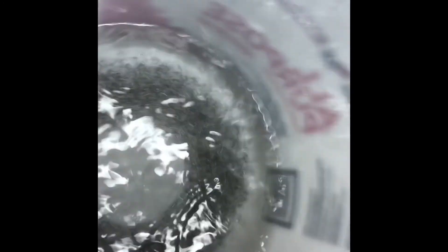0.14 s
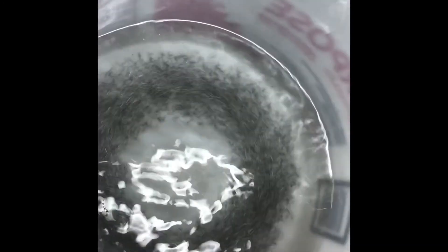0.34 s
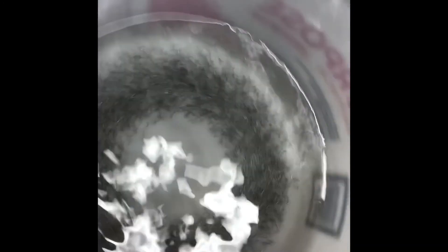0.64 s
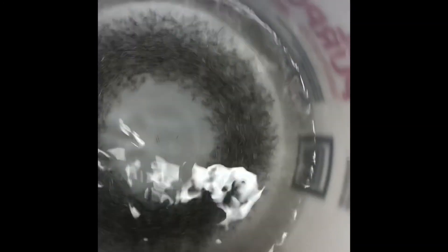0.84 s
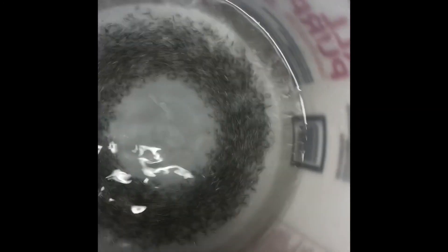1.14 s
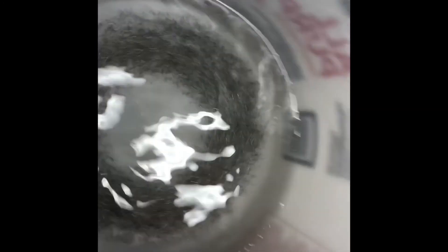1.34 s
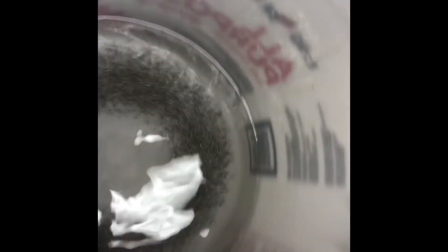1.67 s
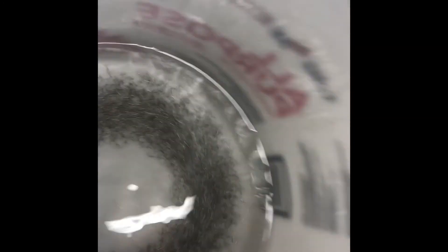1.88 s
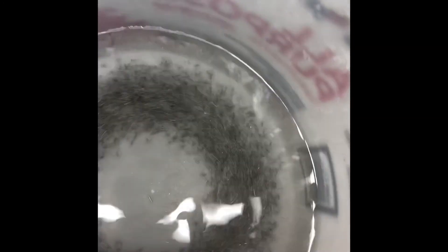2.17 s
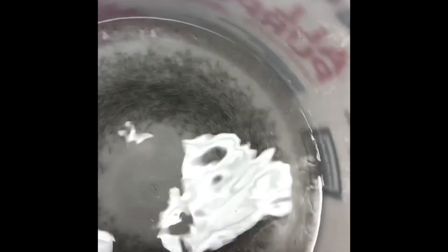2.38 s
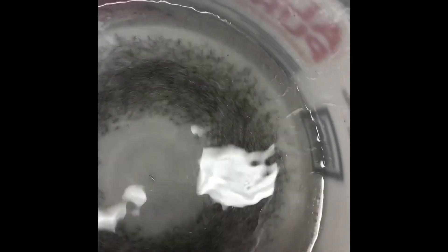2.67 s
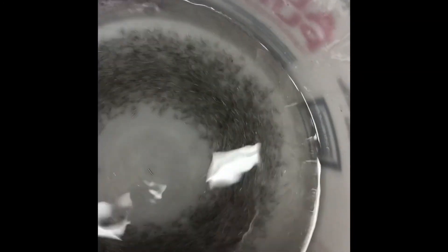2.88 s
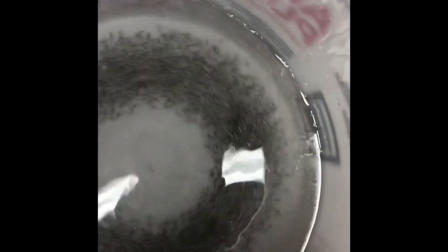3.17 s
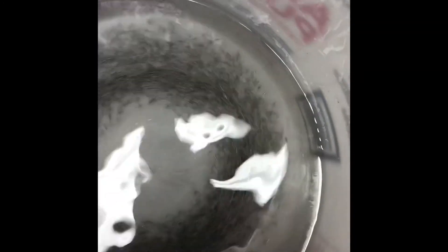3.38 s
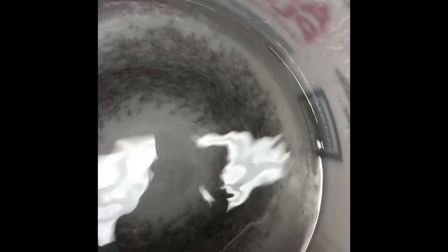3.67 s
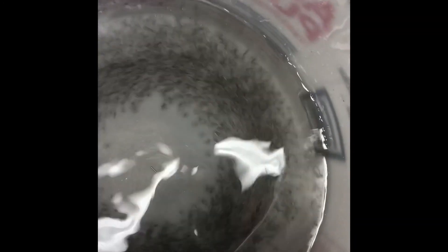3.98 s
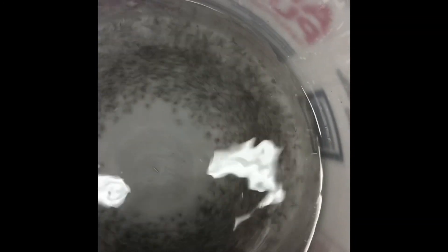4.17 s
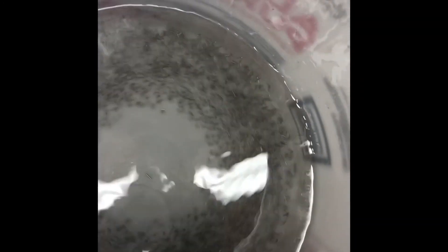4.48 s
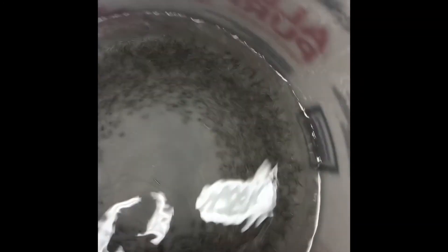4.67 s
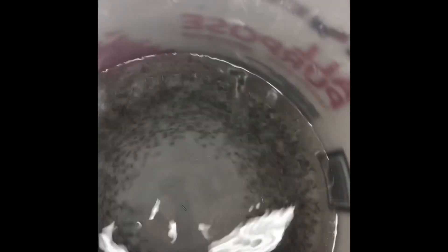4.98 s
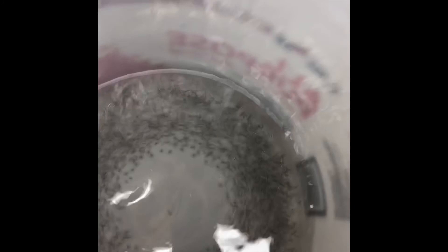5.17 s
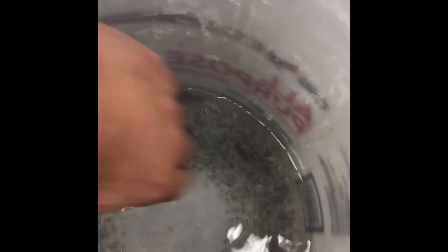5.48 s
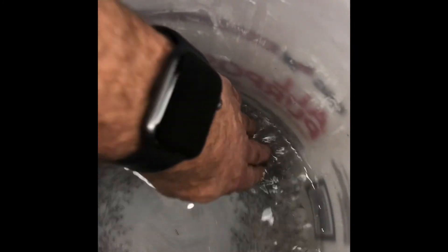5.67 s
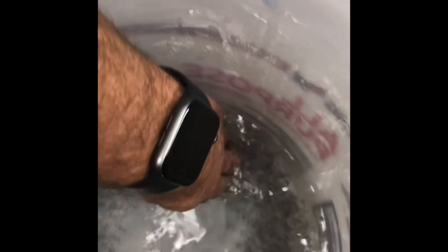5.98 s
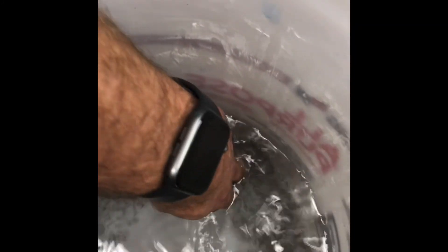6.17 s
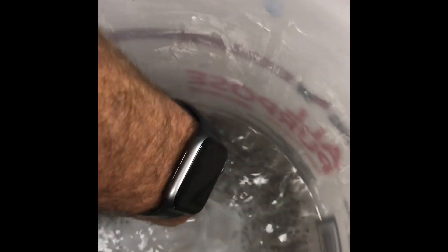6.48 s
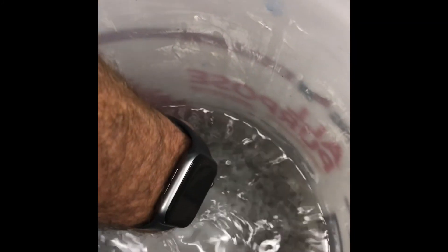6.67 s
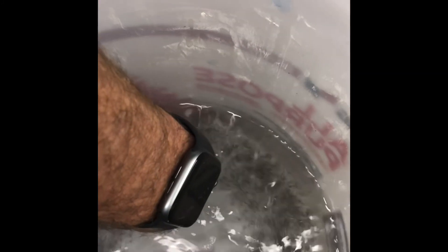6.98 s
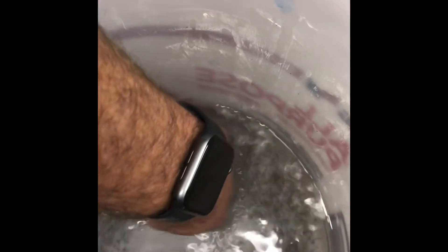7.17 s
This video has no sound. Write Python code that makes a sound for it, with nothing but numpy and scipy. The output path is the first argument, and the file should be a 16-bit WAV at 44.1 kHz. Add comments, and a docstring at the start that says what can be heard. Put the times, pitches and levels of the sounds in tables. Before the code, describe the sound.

Close up in a bucket, thousands of tiny steel pins whirl through water with a dense, ringing hiss over faint motor hum. The microphone moves from the rim to the middle, where sharp high whines swell and the body thins, then pulls back. An arm reaches in, the whine is smothered, and the rush turns duller and steadier over a low drone.

```python
"""A dense, ringing hiss is heard first, over a low hum: a magnetic tumbler whirls pins through a water bucket.
Random pin clicks, bunched by the passing magnets, excite the bucket's resonances; the motor adds hum lines.
The microphone moves from the rim to the middle of the opening, where sharp whines swell, then draws back.
An arm reaches in: damped resonances replace the open ones, rings glide to rest, and the hum becomes a drone."""
import sys
import numpy as np
from scipy import signal
from scipy.fft import rfft, irfft
from scipy.io import wavfile

SR = 44100
rng = np.random.default_rng(int(sys.argv[2]) if len(sys.argv) > 2 else 0)


def bounce(signal):
    """Save signal as a 16-bit WAV file at the path given by the first command-line argument."""
    frames = np.transpose(np.atleast_2d(signal))
    limited = np.clip(frames, -1, 1)
    pcm = np.round(limited * 32767).astype(np.int16)
    wavfile.write(sys.argv[1], SR, pcm)


N = 323730
TIME = np.arange(N) / SR
SIZE, HOP = 2048, 256  # short-time spectrum: frame and step [samples]
BINS = np.fft.rfftfreq(SIZE, 1 / SR)  # [Hz]
STIR_HZ = 0.6  # the hand's slow stirring


def amp(db):
    """Logarithmic level: decibels become an amplitude ratio."""
    return 10 ** (np.asarray(db) / 20)


def evened(x):
    """Normalization: the signal is scaled to an rms of 1."""
    return x / np.sqrt(np.mean(x ** 2) + 1e-20)


def blend(a, b, share):
    """Linear interpolation: a becomes b as the share goes from 0 to 1."""
    return a + share * (b - a)


def swell(t, centre_s, half_s):
    """Gaussian envelope: a smooth rise to 1 and fall, down to 1/e at half_s from the centre."""
    return np.exp(-((t - centre_s) / half_s) ** 2)


def drift(rate_hz):
    """Low-passed noise: a random wander of rms 1, mostly slower than the rate."""
    hz = np.fft.rfftfreq(N, 1 / SR)
    spectrum = rfft(rng.standard_normal(N))
    return evened(irfft(spectrum / (1 + (hz / rate_hz) ** 4), N))


def follow(table, t):
    """Piecewise-linear control: the columns of a curve at the times t."""
    s, *columns = np.transpose(table)
    return [np.interp(t, s, column) for column in columns]


def bell(hz, width):
    """Resonance: steep power response around each frequency, one row for each."""
    detuning = (BINS - hz[:, None]) / width[:, None]
    return (1 + detuning ** 2) ** -3.0


def band_db(power, lo, hi):
    """Band level: power density summed over one band in each frame."""
    inside = (BINS > lo) & (BINS < hi)
    return 10 * np.log10(power[:, inside].sum(1) * SR / SIZE)


def resonance(hz, db, width_hz):
    """Tuned resonance: the power of one peak with a pitch and a total level in each frame."""
    power = bell(hz * np.ones(len(db)), width_hz * np.ones(len(db)))
    return power * amp(db - band_db(power, 0, SR))[:, None] ** 2


# where the microphone is: (time [s], place [0 at the rim to 1 over the middle])
MIC_POSITION = [(0, 0.067), (1.1, 0), (1.5, 0.38), (1.8, 0.67), (2.1, 0.86), (3.2, 0.83), (4.4, 1),
                (4.8, 0.82), (5.2, 0)]
# the arm's damping; a little colours the sound from the start: (time [s], share [0-1])
ARM_DAMPING = [(4.7, 0.1), (5.15, 0.44), (5.4, 0.97), (5.7, 1)]
# the microphone crosses the rim: (time [s], half length [s], strength [0-1])
RIM_CROSSINGS = [(1.397, 0.24, 0.34), (5.046, 0.24, 1)]


def placing(t):
    """Source-receiver geometry: microphone over the middle, the arm's damping, rim in the way, each 0-1."""
    middle, arm = (np.clip(follow(curve, t)[0], 0, 1) for curve in (MIC_POSITION, ARM_DAMPING))
    crossing = sum(strength * swell(t, s, half_s) for s, half_s, strength in RIM_CROSSINGS)
    return middle, arm, crossing


def collisions(size_db=1.72, magnet_db=0.58, slosh_db=0.15, clump_db=0.49, clump_hz=40):
    """Shot noise: random pin clicks of uneven size, bunched by each passing magnet and the water's swirl."""
    hits_per_s, magnet_hz, slosh_hz = 26000, 51.8, 2.6
    hits = rng.random(N) < hits_per_s / SR
    sizes = amp(size_db * np.minimum(rng.exponential(1, N), 4))
    signs = rng.choice([-1, 1], N)
    turns = np.cumsum(magnet_hz + 0.3 * drift(2)) / SR
    surge_db = magnet_db * np.sin(2 * np.pi * turns)
    surge_db += slosh_db * np.sin(2 * np.pi * slosh_hz * TIME)
    return evened(hits * sizes * signs * amp(surge_db + clump_db * drift(clump_hz)))


# resonances of the open bucket, levels relative:
# (frequency [Hz], width [Hz], density at the rim [dB per Hz], density over the middle [dB per Hz])
OPEN_MODES = [(215, 20, -74, -63.5), (258, 12, -60.5, -55.5), (562, 47, -67, -67.5),
              (766.5, 29.3, -49.5, -54.5), (804, 19, -53.5, -52), (925, 80, -59, -55),
              (1142, 62, -53.5, -56), (1469, 61, -52.5, -47.5), (1550, 37, -48, -47),
              (1662, 35, -46, -44.5), (1743, 140, -49.5, -57), (1889, 66, -50.5, -43.5),
              (2157, 28.4, -48, -42.5), (2383, 25, -60, -51.5), (2696, 20, -42, -47.5),
              (3272, 41, -55, -45.5), (3487, 36, -55, -45), (3850, 170, -62, -53), (4560, 400, -58, -61),
              (5290, 58, -54.5, -43.5), (5384, 45, -72, -48), (5730, 47, -60, -49), (6242, 54, -54, -49.5),
              (7330, 810, -61.5, -54), (7860, 59, -74, -54), (8331, 70, -61, -49), (8920, 130, -58, -50.5),
              (11510, 165, -52, -48), (12320, 782, -58, -61), (12550, 200, -59, -53)]
# resonances with an arm in the bucket: (frequency [Hz], width [Hz], relative density [dB per Hz])
ARM_MODES = [(228, 39, -68.5), (510, 21, -62.5), (583, 28, -68.5), (808, 78, -56), (957, 180, -59.8),
             (1430, 36, -50.5), (1634, 90, -48.5), (1895, 61, -51), (2040, 130, -57), (2573, 59, -52),
             (2824, 54, -50), (3003, 110, -54.5), (3670, 170, -57), (4790, 260, -56), (5230, 97, -52),
             (7660, 1100, -59.5), (11720, 560, -53.5)]
# the hiss between the resonances: (frequency [Hz], relative density [dB per Hz])
HISS = [(30, -98.5), (90, -80), (180, -71), (400, -76), (650, -78), (1000, -67.5), (2500, -62), (4000, -58),
        (6500, -57.5), (9800, -59), (11500, -55.5), (13300, -58), (15600, -59)]
DAMPED_SHARE = 0.18, 0.92  # share of the arm's set of resonances at zero and at full arm damping


def bucket(t):
    """Modal filtering: power that the bucket passes to the microphone, as frames x bins."""
    middle, arm, _ = placing(t)
    hz, width, rim_db, middle_db = np.transpose(OPEN_MODES)
    empty = amp(blend(rim_db, middle_db, middle[:, None])) ** 2 @ bell(hz, width)
    hz, width, db = np.transpose(ARM_MODES)
    blocked = amp(db) ** 2 @ bell(hz, width)
    hz, db = np.transpose(HISS)
    hiss = amp(np.interp(np.log(BINS + 1), np.log(hz), db)) ** 2
    damped = blend(*DAMPED_SHARE, arm[:, None])
    return hiss + bent(blend(empty, blocked, damped), t) + arm_rings(t)


# delay of the wall's echo, which changes as the microphone moves: (time [s], delay [s])
WALL_ECHO = [(.8, .00236), (1.1, .00252), (1.45, .00273), (1.93, 0.0023), (2.35, .00258), (3.3, .002375),
             (4.1, .00239), (4.5, .002464), (4.85, .0026), (5.25, .00278), (6.3, .00266), (7.3, .0027)]
WALL_SHARE, CROSSING_SHARE = 0.089, 0.06  # wall echo's amplitude share, and its rise at the rim
RIM_SHARE, RIM_PATH = 0.21, 0.58  # rim echo's share at a full crossing; its delay against the wall's
STIR_S = 0.00006  # delay swing by the stirring, before each path's own sway [s]


def reflections(t, scatter=0.055, longest_s=0.009, sway=0.9, moving_gain=2.5, count=20):
    """Comb interference: echoes off rim and wall notch the hiss; the teeth slide as the delays change."""
    _, arm, crossing = (control[:, None] for control in placing(t))
    delay = follow(WALL_ECHO, t)[0][:, None]
    wall = WALL_SHARE + CROSSING_SHARE * crossing
    comb = np.ones((len(t), len(BINS)))
    for late, share in ((RIM_PATH * delay, RIM_SHARE * crossing), (delay, wall)):
        comb *= 1 + 2 * share * np.cos(2 * np.pi * BINS * late) + share ** 2
    stirring = STIR_S * arm * np.sin(2 * np.pi * STIR_HZ * t[:, None])
    moved = delay - delay.mean() + stirring
    ripple = np.zeros_like(comb)
    for path, lean in rng.random((count, 2)):  # fainter bounces between the walls
        late = 0.000992 + path * longest_s + sway * (2 * lean - 1) * moved
        ripple += 2 * scatter * np.cos((2 * np.pi * BINS * late).astype("float32"))
    treble = np.interp(BINS, [1200, 4500], [0.3, 1])  # the ripple is weak below 1200 Hz, full above 4500 Hz
    comb *= np.exp(ripple * treble * (1.16 + moving_gain * wall))
    return comb / comb.mean(1, keepdims=True)


# loudness of the churning; rows are hollow body, rattle, edge and fizz:
# (level at the rim [dB], level over the middle [dB], level at full arm damping [dB],
#  change while crossing the rim [dB], change in a hot spot [dB])
CHURN_LEVELS = [(-24.5, -29, -26.5, -7, -3), (-21, -19, -23, -1.5, -1.5), (-25.5, -23.5, -24.5, -3.5, -1.2),
                (-16, -16.5, -16, -0.5, 0)]


def churned(power, t, wander_db=0.97, wander_hz=1.4):
    """Band-level control: four bands follow microphone and arm; all but the fizz wander a little."""
    middle, arm, crossing = placing(t)
    hot = sum(swell(t, s, half_s) for s, half_s, _, _ in HOT_SPOTS)
    bands = [(650, 1300), (1400, 2300), (3000, 4400), (4400, 15000)]  # [Hz]
    rise_db = []
    for (rim_db, middle_db, arm_db, shade_db, hot_db), band in zip(CHURN_LEVELS, bands):
        level_db = blend(blend(rim_db, middle_db, middle), arm_db, arm)
        level_db = level_db + shade_db * crossing + hot_db * hot
        rise_db.append(level_db - band_db(power, *band))
    rise_db = np.array(rise_db)
    rise_db[:-1] += [wander_db * np.interp(t, TIME, drift(wander_hz)) for _ in bands[:-1]]
    # each weight is flat over its band and crossfades to its neighbours; below 450 Hz nothing changes
    corners = [450, 650, 1250, 1450, 2300, 3000, 4200, 4600]
    weights = [np.interp(BINS, corners, np.repeat(row, 2)[1:-1]) for row in np.eye(5)[1:]]
    return power * amp(rise_db.T @ weights) ** 2


# a close pair of sharp air resonances, strongest on the bucket's axis:
# (frequency [Hz], level at the rim [dB], level over the middle [dB]), before the arm's damping
AXIAL_PAIR = [(2796, -33.5, -24), (2861, -34.5, -24)]
# hot spots that the microphone passes, where the whine swells and the roar thins:
# (time [s], half length [s], frequency [Hz], peak level before the arm's damping [dB])
HOT_SPOTS = [(2.13, 0.19, 2850, -17.5), (4.59, 0.13, 2837, -15), (5.105, 0.12, 2850, -18.5)]


def whine(t, pair_width_hz=28, swell_width_hz=36, shade_db=-10):
    """Axial air resonance: a pair rings, one strong tone takes over in a hot spot; rim and arm smother it."""
    middle, arm, crossing = placing(t)
    power = 0
    for hz, rim_db, middle_db in AXIAL_PAIR:
        level_db = blend(rim_db, middle_db, middle) + shade_db * crossing
        power = power + resonance(hz, level_db, pair_width_hz)
    for s, half_s, hz, db in HOT_SPOTS:
        tone = resonance(hz, np.full(len(t), db), swell_width_hz)
        power = blend(power, tone, swell(t, s, half_s)[:, None])
    return (1 - arm[:, None]) * power


def pins():
    """Source-filter principle: the collisions heard through the bucket, its echoes and its air."""
    _, t, spectrum = signal.stft(collisions(), SR, nperseg=SIZE, noverlap=SIZE - HOP)
    power = churned(bucket(t) * reflections(t), t) + whine(t)
    filtered = spectrum * np.sqrt(power.T * SR / 2)  # density [per Hz] to gain on white noise
    return signal.istft(filtered, SR, nperseg=SIZE, noverlap=SIZE - HOP)[1][:N]


# hum of the motor and its stand: (frequency [Hz], mean level at the rim [dB], over the middle [dB])
HUM_LINES = [(90, -66, -62.5), (214, -54, -66), (225, -65, -50), (259, -61, -55.5), (341, -56.5, -70),
             (561, -50, -52.5), (608, -52, -56)]
# the drone that it shifts to: (frequency [Hz], mean level at zero arm damping [dB], at full damping [dB])
DRONE_LINES = [(30, -69, -69), (119, -72, -59.5), (130, -53, -80), (163, -55, -56), (209, -55.5, -45),
               (267.6, -51, -53), (575, -65, -56)]


def motor(waver_hz=0.75, flutter_db=1.0, fade_s=0.25, drone_s=4.4):
    """Additive line spectrum: wavering hum lines cross-fade to a drone around drone_s."""
    middle, arm, _ = placing(TIME)
    wander, flutter = drift(4.3), drift(5.6)
    shifted = np.clip(0.5 + (TIME - drone_s) / fade_s, 0, 1)
    out = np.zeros(N)
    for lines, control, share in ((HUM_LINES, middle, 1 - shifted), (DRONE_LINES, arm, shifted)):
        for hz, from_db, to_db in lines:
            shift = rng.integers(N)  # every line wavers at its own moments
            turns = np.cumsum(hz + waver_hz * np.roll(wander, shift)) / SR
            db = blend(from_db, to_db, control) + flutter_db * np.roll(flutter, shift)
            out += share * amp(db) * np.sqrt(2) * np.sin(2 * np.pi * turns)
    return out


def bent(power, t, sag_share=0.022, stir_share=0.0075):
    """Modal detuning: high resonances sag as the microphone crosses the rim and waver as the hand stirs."""
    _, arm, crossing = placing(t)
    sag = sag_share * crossing - stir_share * arm * np.cos(2 * np.pi * STIR_HZ * t)
    treble = np.interp(BINS, [2200, 2700], [0, 1])
    return np.array([np.interp(BINS * (1 + s * treble), BINS, frame) for s, frame in zip(sag, power)])


# narrow resonances around the arm, which swell and glide to rest as it dips:
# (start [s], rise time [s], first frequency [Hz], resting frequency [Hz], glide time [s], relative level [dB])
GAP_RINGS = [(5.18, .11, 785, 700, .22, -32.3), (5.2, 0.59, 1120, 1198, .5, -30),
             (5.6, .35, 3340, 3408, 0.27, -31.5)]


def arm_rings(t, ring_q=38, widest_hz=62):
    """Cavity resonance: each gap around the arm starts to ring and settles on its pitch."""
    power = 0
    for start, rise_s, first_hz, rest_hz, glide_s, db in GAP_RINGS:
        age = np.maximum(t - start, 0)
        hz = blend(rest_hz, first_hz, np.exp(-age / glide_s))
        grown = 1 - np.exp(-age / rise_s)
        width_hz = min(rest_hz / ring_q, widest_hz)
        power = power + grown[:, None] ** 2 * resonance(hz, np.full(len(t), db), width_hz)
    return power


def scene():
    """Superposition: pins and motor add, the same in both channels."""
    return np.tile(pins() + motor(), (2, 1))


def record(dry, ceiling=0.85, edge_hz=15800):
    """Soft saturation and band limiting: the highest peaks are rounded, then a low-pass ends the treble."""
    rounded = dry / (1 + (dry / ceiling) ** 8) ** (1 / 8)
    lowpass = signal.firwin(511, edge_hz, window=("kaiser", 9), fs=SR)
    return signal.oaconvolve(rounded, lowpass[None], "same")


dry = scene()
out = record(dry)
bounce(out)
```